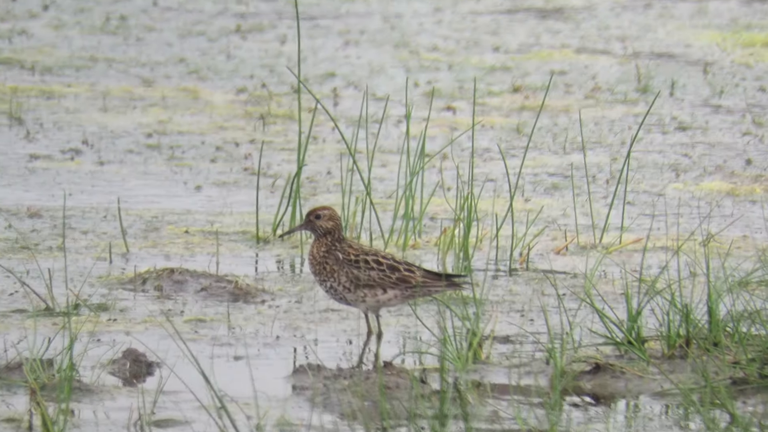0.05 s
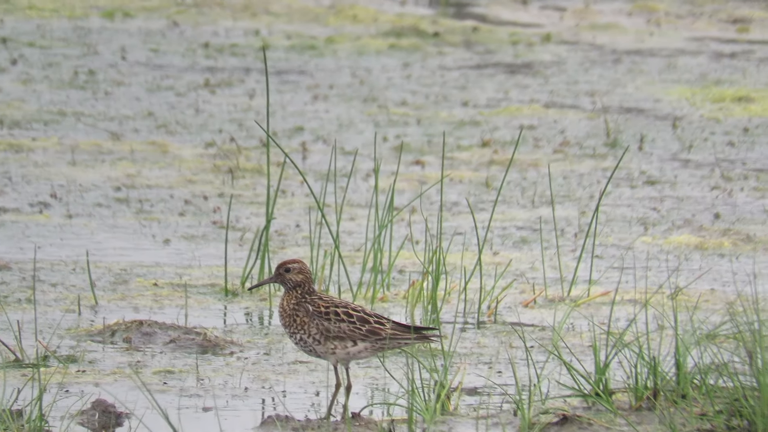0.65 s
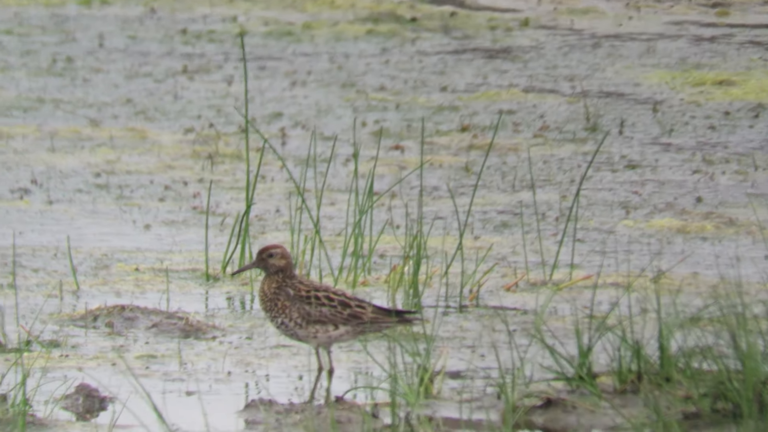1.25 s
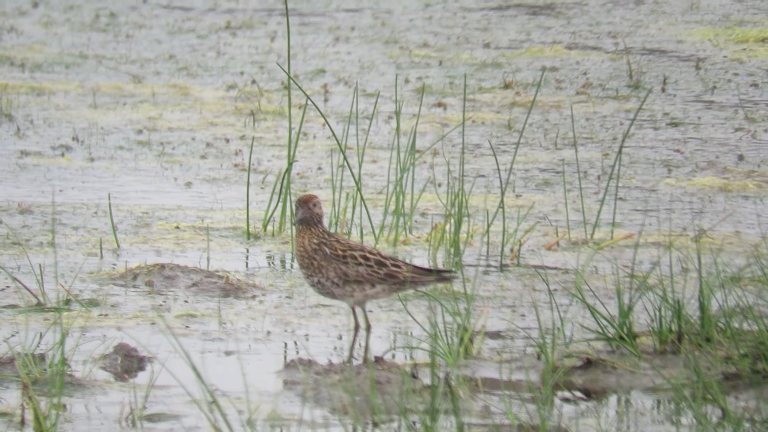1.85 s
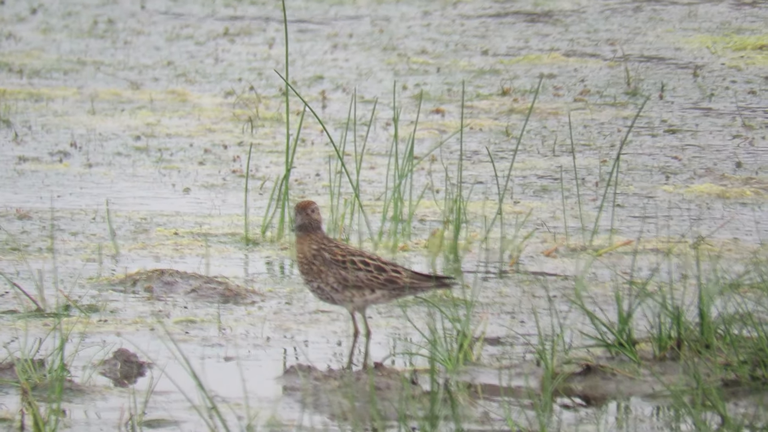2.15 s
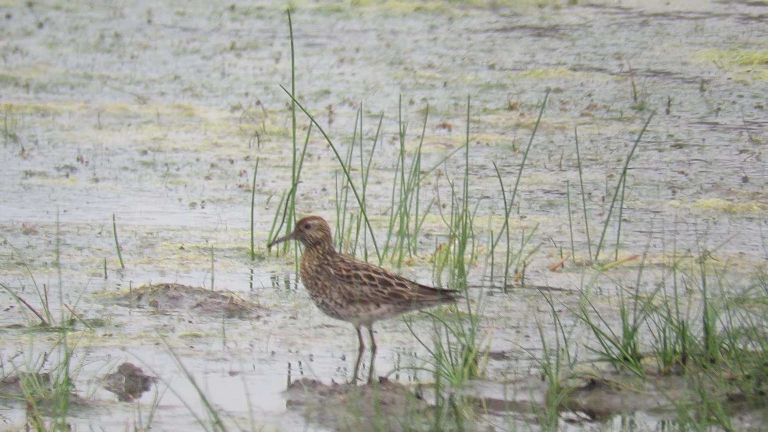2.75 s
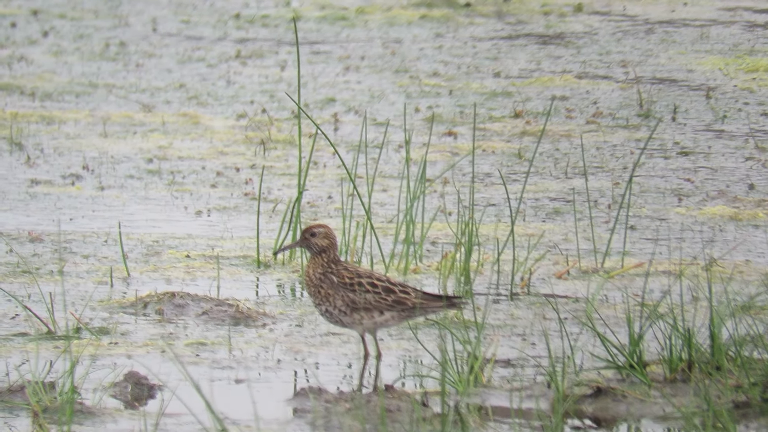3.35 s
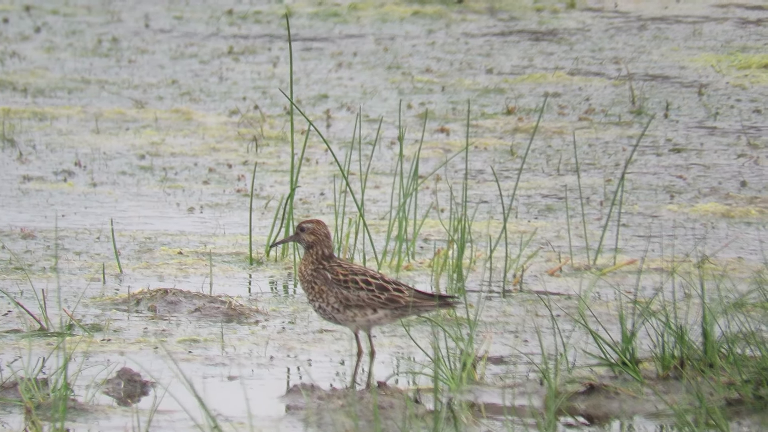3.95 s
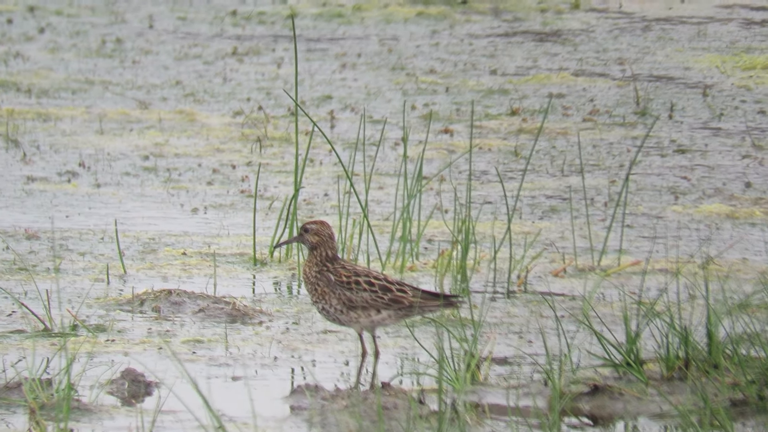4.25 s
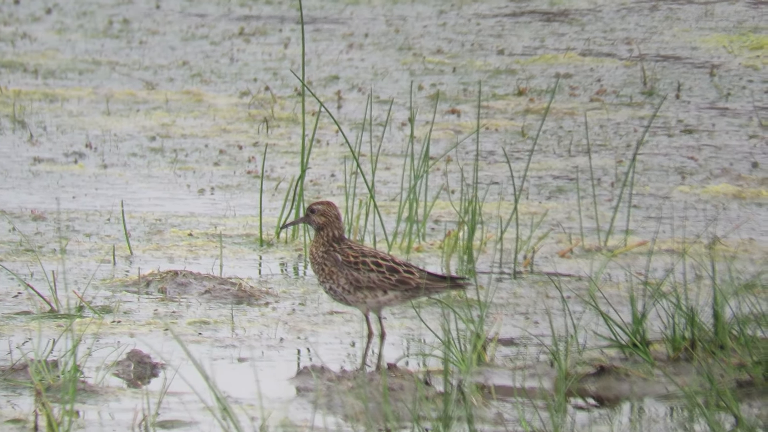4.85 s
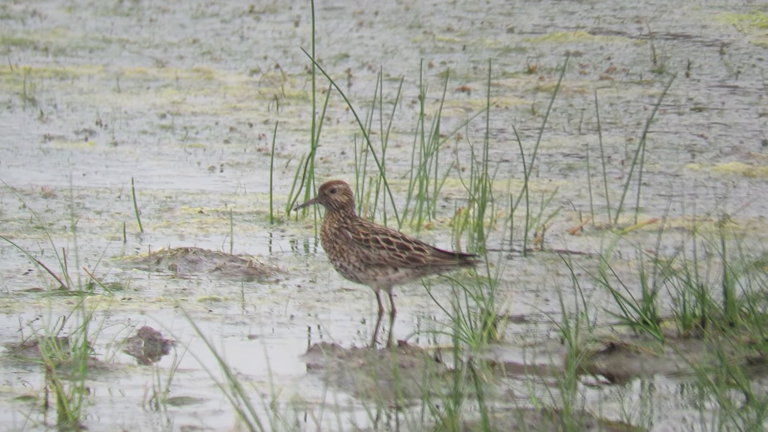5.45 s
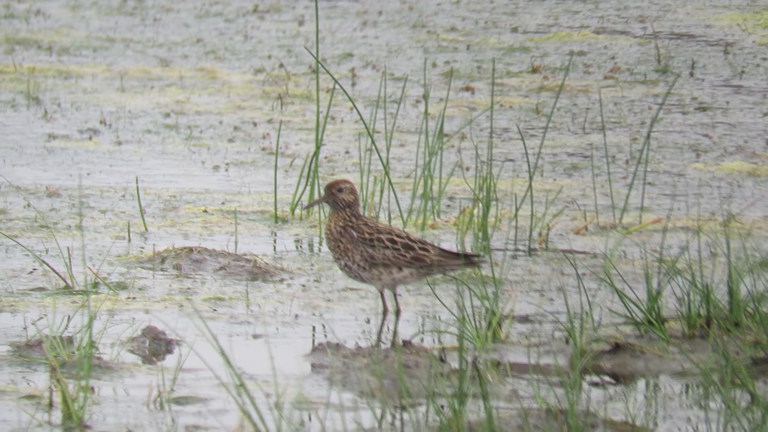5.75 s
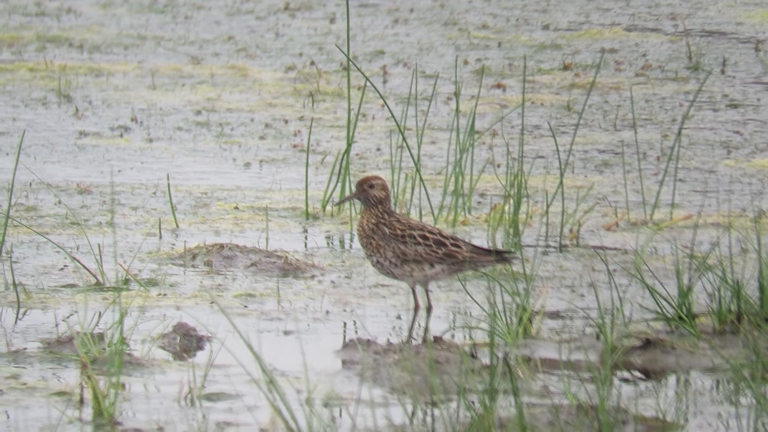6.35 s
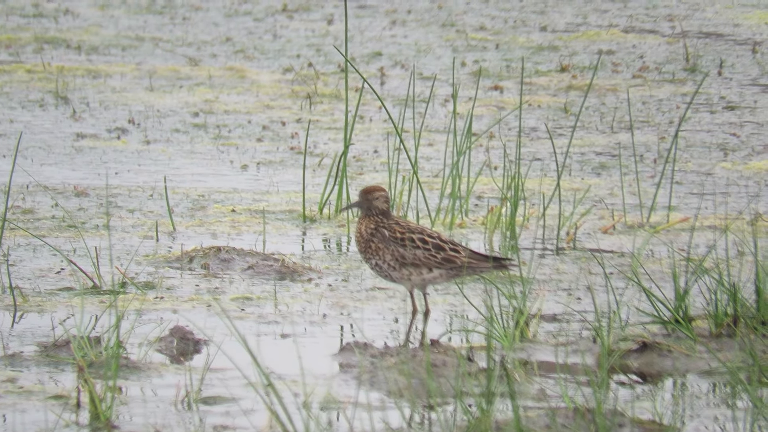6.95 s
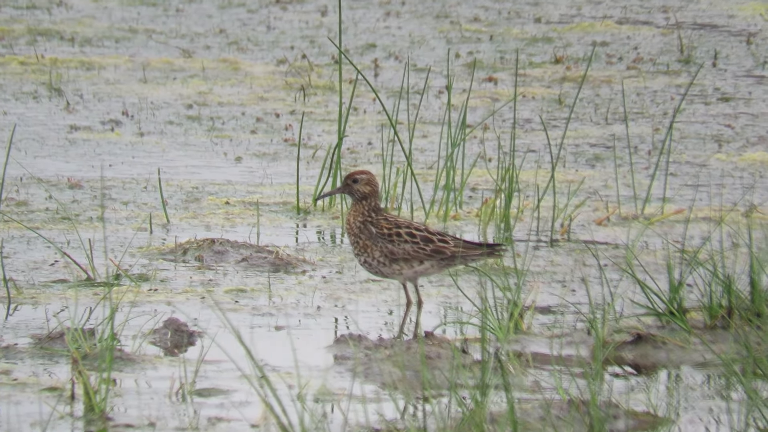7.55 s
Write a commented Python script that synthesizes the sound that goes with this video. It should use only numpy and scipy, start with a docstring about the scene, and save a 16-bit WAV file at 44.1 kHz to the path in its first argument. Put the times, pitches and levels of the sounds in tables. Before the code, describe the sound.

Uneven gusts buffet the microphone with a low, fluttering rumble, easing briefly to faint hiss, with a few small knocks and a single chirp.

```python
"""Gusty wind buffets a camera's two-port microphone at a shallow lake shore.
Eddies thump and flutter on the ports; hard gusts tick and the housing takes a few small knocks.
An insect's wing strokes buzz at a very high pitch in the grass, a near bird chirps once, far birds peep.
Behind them: the soft whirr of the lens, distant air and a steady hiss."""
import sys
import numpy as np
from scipy import signal
from scipy.fft import rfft, irfft
from scipy.io import wavfile
from scipy.ndimage import uniform_filter1d

SR = 44100
rng = np.random.default_rng(int(sys.argv[2]) if len(sys.argv) > 2 else 0)


def file_out(sig):
    """Save sig as 16-bit WAV at sys.argv[1]."""
    # one column per channel
    cols = np.atleast_2d(sig).T
    # limit, then scale
    lim = np.clip(cols, -1, 1)
    pcm = np.round(lim * 32767).astype(np.int16)
    wavfile.write(sys.argv[1], SR, pcm)


N = 340011
T = np.arange(N) / SR
HZ = np.fft.rfftfreq(N, 1 / SR)

# gusts (hold start [s], hold [s], level [dB], flutter share [dB])
GUSTS = [(0.078,0.01,-32,-5.5), (0.129,0.031,-36.5,-7), (0.373,0.04,-35.5,-5), (0.448,0.057,-32,-2),
         (0.558,0.014,-38,-6), (0.657,0.033,-37,-2.5), (0.795,0.03,-41,-5), (0.879,0.015,-27,-0.5),
         (0.914,0.06,-30,-1), (0.984,0.073,-33.5,-1.5), (1.139,0.025,-30,-2.5), (1.214,0.041,-32.5,-7.5),
         (1.265,0.06,-30,-1.5), (1.331,0.06,-36,-10), (1.506,0.14,-38.5,-3.5), (1.794,0.047,-33.5,-1.5),
         (1.878,0.089,-29.5,-1.5), (2.077,0.0082,-31,-2.5), (2.2,.052,-30,-4), (2.282,.03,-33.5,-4.5),
         (2.366,0.028,-33.5,-8.5), (2.45,0.018,-30,-4.5), (2.637,.065,-47,-11), (2.787,0.037,-44.5,-9.5),
         (3.235,0.015,-29.5,-3.5), (3.279,0.02,-34,-14.5), (3.342,0.081,-34.5,-5.5),
         (3.396,0.059,-29.5,-3.5), (3.491,0.087,-26.5,-3.5), (3.618,0.087,-26,-3.5),
         (3.73,0.037,-29.5,-6.5), (3.774,0.047,-30,0), (3.822,0.058,-28,-10.5), (3.897,0.014,-32.5,-6),
         (3.966,.016,-35,-18), (3.996,0.048,-26.5,-6), (4.08,.035,-39,-7.5), (4.132,0.068,-26.5,-5),
         (4.216,0.067,-28.5,-9), (4.297,0.069,-29,-2.5), (4.383,0.016,-25.5,-3.5), (4.41,.09,-30.5,-1.5),
         (4.531,0.028,-29,-9), (4.584,0.077,-34,-1.5), (4.687,0.044,-31.5,-6.5), (4.754,0.021,-40,-8),
         (4.954,0.02,-29,-6.5), (5.028,.017,-27.5,-1.5), (5.057,0.079,-38,-13.5), (5.147,0.048,-39,-4),
         (5.32,0.013,-40.5,-4), (5.454,0.045,-40,-21), (5.534,0.082,-47,-7.5), (5.655,0.083,-41.5,-4.5),
         (5.918,0.09,-41.5,-14), (6.058,0.049,-42.5,-20), (6.748,0.086,-54.5,-2.5),
         (7.284,0.021,-33.5,-2.5), (7.36,0.02,-38.5,-13), (7.432,0.054,-36.5,0), (7.505,0.037,-37,-7),
         (7.665,0.06,-35.5,-2.5)]
# large single eddies, slaps to booms (time [s], level [dB], pitch [Hz], half length [s])
BUFFETS = [(0.037,-21,260,0.0014), (0.216,-30.5,151,0.0078), (0.452,-17,206,0.0056), (0.683,-23,357,0.0025),
           (.934,-20,360,0.0045), (0.957,-18,370,0.0023), (0.97,-17.5,356,0.0032), (0.991,-21.5,260,0.0044),
           (1.015,-21,345,0.0018), (1.16,-24,226,0.0047), (1.206,-15.5,277,0.0018), (1.309,-17,267,0.0055),
           (1.467,-24,254,0.0017), (1.507,-23,206,0.0025), (1.595,-24.5,292,0.003), (1.743,-16,350,0.0016),
           (1.841,-18,281,.002), (1.861,-21.5,254,0.0043), (1.902,-14.5,299,0.0012),
           (2.108,-20.5,358,0.0034), (2.176,-17,227,0.0026), (2.213,-19,343,0.0066), (2.247,-22,373,0.0044),
           (2.372,-22,156,0.0051), (2.44,-21,227,0.0018), (2.457,-25,205,0.0098), (2.563,-35.5,170,.0044),
           (2.597,-33,150,0.0058), (2.789,-22,135,0.0054), (2.899,-29,113,0.007), (3.002,-28,140,0.0037),
           (3.152,-17.5,180,0.0051), (3.234,-23,269,0.0017), (3.28,-28.5,196,0.0047), (3.42,-8,334,0.0016),
           (3.523,-11.5,287,0.0015), (3.568,-17.5,232,.003), (3.672,-20,364,0.0033),
           (3.69,-14.5,198,0.0023), (3.786,-17,327,0.0033), (3.842,-19,231,0.0028), (3.912,-23.5,284,.0043),
           (3.989,-12,231,0.0021), (4.028,-16,229,0.0067), (4.143,-16.5,266,0.0063), (4.246,-17,215,0.0021),
           (4.308,-14,239,0.0029), (4.331,-17,203,0.0048), (4.381,-13.5,251,0.0029),
           (4.391,-17.5,338,0.0025), (4.42,-20.5,329,0.0015), (4.474,-18.5,282,0.0033),
           (4.596,-19,267,0.0038), (4.63,-21,280,.0025), (4.665,-15,239,0.0022), (4.805,-27,171,0.0023),
           (4.865,-24,228,0.0019), (4.974,-14,264,0.0015), (5.03,-24.5,198,.0025), (5.066,-24.5,181,0.0082),
           (5.157,-22,290,0.0016), (5.379,-30,218,0.0021), (5.473,-20.5,251,0.0024),
           (5.547,-28.5,143,.0043), (5.665,-20.5,272,0.0029), (5.916,-38,132,0.012),
           (5.953,-26.5,162,0.002), (6.059,-26.5,179,0.0028), (6.08,-29,295,0.0034),
           (6.525,-40.5,161,0.0049), (6.6,-36.5,131,0.0023), (6.781,-44.5,129,0.022),
           (6.83,-35.5,207,0.0023), (7.187,-40.5,153,0.0032), (7.244,-37.5,134,.0048),
           (7.569,-16.5,290,0.0016), (7.628,-20,327,0.0016), (7.67,-23.5,155,.0053)]
# light wind between gusts (time [s], level [dB], deep eddy level [dB])
BREEZE = [(0.0, -43.5, -59), (0.2, -49, -42.5), (0.31, -55, -58), (0.5, -48, -50), (0.6, -52, -53),
          (0.72, -49, -48), (0.98, -38.5, -60), (1.1, -39.5, -56), (1.3, -38, -54), (1.44, -49.5, -52),
          (2.05, -43.5, -56.5), (2.46, -47, -44.5), (2.73, -62, -62), (3.12, -52, -51.5),
          (3.42, -39.5, -49.5), (4.35, -36.5, -57), (4.88, -51, -66), (5.3, -51, -58), (5.8, -56.5, -55),
          (6.25, -81, -66.5), (7.06, -74, -71), (7.37, -46.5, -55), (7.71, -39.5, -58)]
# largest, slowest eddies (frequency [Hz], density [dB])
DEEP_SPECTRUM = [(15, -26), (30, -16), (55, -9), (95, 2), (140, -8.5), (240, -51)]
# slow turbulence (frequency [Hz], density [dB])
RUMBLE_SPECTRUM = [(20, -38.5), (55, -31), (90, -7), (140, 1.5), (220, 0), (290, -6.5), (370, -20.5),
                   (500, -33)]
# fast turbulence (frequency [Hz], density [dB])
FLUTTER_SPECTRUM = [(120, -36), (220, -27), (310, 2), (400, 0), (480, -5.5), (700, -20)]
# microphone response to wind (frequency [Hz], gain [dB])
WIND_RESPONSE = [(10, -49.5), (40, -4.5), (90, -0.5), (440, 2), (485, 2), (530, -17.5), (640, -12),
                 (800, -30), (1500, -57.5), (3000, -95)]
# wind difference between ports (frequency [Hz], gain [dB])
SIDE_RESPONSE = [(50, -41), (90, -33), (160, -22.5), (250, -15.5), (350, -10.5), (450, -8)]
# port difference, raised as the strongest gust veers (time [s], gain [dB])
VEER = [(0, -11), (2.8, -5.5), (3.15, 3.5), (3.4, 4.5), (3.95, 3), (4.25, 2.5), (4.5, -10), (7.7, -9.5)]
# ticks in gusts (time [s], level [dB])
TICKS = [(0.942, -37.5), (0.953, -42), (0.963, -41), (1.753, -42.5), (1.912, -43), (3.406, -36.5),
         (3.427, -36.5), (4.321, -39.5), (5.685, -45)]
# ticks and rushing air (frequency [Hz], density [dB])
TICK_SPECTRUM = [(300, 0), (700, 23.5), (1500, 13), (3000, 2.5), (6000, -11.5), (12000, -30)]
# housing knocks (time [s], pitch [Hz], level [dB], T60 [s])
KNOCKS = [(1.325, 1440, -41, 0.027), (1.325, 2700, -44, 0.011), (2.461, 540, -32.5, 0.041),
          (4.327, 580, -34, 0.044), (4.625, 562, -26.5, 0.032)]
# insect bouts (start [s])
BUZZ_STARTS = [0.008, 0.84, 1.45, 2.33, 2.87, 3.3, 4.34, 4.82, 5.83, 6.4, 7.38]
# insect resonance (frequency [Hz], density [dB])
WING_SPECTRUM = [(9800, -35), (10900, -12), (11350, -14), (11600, 0), (11800, 0), (12100, -14),
                 (12900, -14), (13500, -30)]
# chirp contour (time [s], pitch [Hz], level [dB])
CHIRP = [(4.5505, 2100, -62), (4.553, 2350, -51.5), (4.559, 2520, -48), (4.564, 2540, -48),
         (4.569, 2390, -50), (4.574, 2230, -57), (4.581, 2100, -76)]
# hoarse chirp onset (frequency [Hz], density [dB])
RASP_SPECTRUM = [(2000, -40), (3000, -9), (4200, 2), (5500, -38)]
# far birds (start [s], length [s], pitch [Hz], level [dB])
PEEPS = [(1.44, .055, 3300, -72), (1.615, .035, 3400, -72.5), (1.675, .03, 3520, -72.5),
         (2.61, .085, 4380, -77.5), (5.875, .075, 4900, -75.5), (6.005, .03, 4120, -75.5),
         (7.07, .03, 4400, -76)]
# lens resonances (centre [Hz], half width [Hz], level [dB])
WHIRR_MODES = [(390, 16, -67), (800, 28, -66.5), (953, 42, -64.2), (1075, 75, -66.5)]
# whirr strength (time [s], gain [dB])
WHIRR_GAIN = [(0, -2.5), (0.8, 0), (1.5, 0.5), (2.1, -1), (3.8, 0.5), (4.4, -0.5), (4.85, 3), (5.55, -1.5),
              (6.2, 2.5), (7.7, 0)]
# hum within the whirr (time [s], level [dB])
HUM_LEVEL = [(.3, -80), (.9, -67.5), (1.45, -61.5), (2.1, -69.5), (2.85, -72), (3.6, -68), (4.4, -68.5),
             (4.9, -64.5), (6.1, -64.8), (7.7, -70)]
# electronics whines (centre [Hz], half width [Hz], level [dB], port phase lag [rad])
WHINES = [(7434, 3, -87.5, 2.3), (8150, 3, -91.5, 1.3), (8190, 40, -92, 1.0), (11149, 3, -96, 1.0),
          (11930, 60, -92, 0.3)]
# lens motor squeaks (start [s], length [s], pitch [Hz], level [dB])
SQUEAKS = [(0.98, .04, 11170, -80), (3.541, .051, 12030, -73.5)]
# air over the lake (frequency [Hz], density [dB])
AIR_SPECTRUM = [(20, -32), (55, 7), (120, 4), (250, -1), (520, -0.5), (720, -2), (1100, -3), (1250, -9),
                (1450, -7), (1800, -14), (3000, -23), (8000, -49.5)]
# port hiss (frequency [Hz], density [dB])
HISS_SPECTRUM = [(250, -31), (700, -1), (1500, 3), (2400, 3), (4300, -0.5), (6500, -5.5), (10000, -10.5),
                 (12000, -10.5), (13000, -18), (14000, -23)]


def wind(lump_db=6.5, lump_hz=80, deep_db=2.0, deep_follow=0.51, side_lag_s=0.00045, own_db=-2.5):
    """Lumpy turbulence and single eddies press on both ports; mainly the small eddies differ."""
    times_s, *levels_db = np.transpose(BREEZE)
    breeze_db, depth_db = (np.interp(T, times_s, db) for db in levels_db)
    slow_power, fast_power = turbulence_power()
    lumps = gain_of(lump_db * np.clip(wander(lump_hz), -2, 1))
    lumps = unit_rms(steadied(lumps, span_s=0.04))
    rumble = np.sqrt(slow_power * lumps) * steadied(noise(RUMBLE_SPECTRUM), span_s=0.027)
    flutter = np.sqrt(fast_power) * lumps * steadied(noise(FLUTTER_SPECTRUM), span_s=0.044)
    # the largest eddies linger through lulls and only partly follow gusts
    swell_db = deep_follow * (10 * np.log10(slow_power + fast_power) - breeze_db)
    deep = gain_of(deep_db + depth_db + swell_db) * steadied(noise(DEEP_SPECTRUM), span_s=0.033)
    pressure = rumble + flutter + deep + buffets()
    force = np.sqrt(abs(uniform_filter1d(pressure ** 2, size=400)))
    # wind from one side: ports differ in strength, timing and their own small eddies
    eddy_noise = noise(RUMBLE_SPECTRUM) + 0.5 * noise(FLUTTER_SPECTRUM)
    own_eddies = gain_of(own_db) * force * steadied(eddy_noise, span_s=0.027)
    side = envelope(VEER) * colour(delayed(pressure, side_lag_s) + own_eddies, SIDE_RESPONSE)
    ports = np.array([pressure + side, pressure - side])
    return colour(ports, WIND_RESPONSE) + force * rush()


def turbulence_power(puff_db=4, puff_hz=11, rise_s=0.0082, fall_s=0.0072, wake_db=-18, wake_s=0.0093):
    """Slow and fast turbulence power from a puffing breeze, gusts and the wakes of large eddies."""
    breeze_db = np.interp(T, *np.transpose(BREEZE)[:2]) + puff_db * np.clip(wander(puff_hz), -2, 1)
    total = gain_of(breeze_db) ** 2
    share_db = -12.5 + 0.17 * (breeze_db + 44)  # a stronger breeze flutters more
    fast = total * gain_of(np.minimum(share_db, 0)) ** 2
    for start_s, hold_s, db, flutter_db in GUSTS:
        rise = np.clip(1 + (T - start_s) / rise_s, 0, 1)
        fall = np.exp(-np.clip((T - start_s - hold_s) / fall_s, 0, 20))
        gust = (gain_of(db) * rise * fall) ** 2
        total += gust
        fast += gust * gain_of(min(flutter_db, 0)) ** 2
    for time_s, db, _, _ in BUFFETS:
        near = abs(T - time_s) < 2 * wake_s
        wake = gain_of(db + wake_db) * np.exp(-((T[near] - time_s) / wake_s) ** 2)
        total[near] += wake ** 2
    return np.maximum(total - fast, 0), fast


def buffets(slowing=0.23):
    """Each large eddy is a few pressure swings at most, slowing as it passes."""
    out = np.zeros(N)
    for (time_s, db, hz, half_s), phase_cycles in zip(BUFFETS, rng.random(len(BUFFETS))):
        near = abs(T - time_s) < 4 * half_s
        t = T[near] - time_s
        passage = t / half_s
        cycles = phase_cycles + hz * t * (1 - slowing * np.tanh(passage / 2))
        out[near] += gain_of(db) * np.exp(-passage ** 2) * np.cos(2 * np.pi * cycles)
    return out


def rush(hiss_db=-37.5, crackle_db=-40.5, crackles_per_s=60):
    """Air hisses and crackles over the camera body, per unit of wind force."""
    snaps = rng.standard_normal((2, N)) * (rng.random((2, N)) < crackles_per_s / SR)
    crackle = unit_rms(colour(snaps, TICK_SPECTRUM))
    hiss = np.array([noise(TICK_SPECTRUM), noise(TICK_SPECTRUM)])
    return gain_of(hiss_db) * hiss + gain_of(crackle_db) * crackle


def ticks(boost_db=3.5):
    """Tiny snaps at the ports where gusts strike hard."""
    times_s, db = np.transpose(TICKS)
    impulses = np.zeros(N)
    impulses[np.round(times_s * SR).astype(int)] = gain_of(db)
    snaps = colour(impulses, TICK_SPECTRUM)
    return gain_of(db.max() + boost_db) * snaps / abs(snaps).max()


def knocks(rise_s=0.0021):
    """Knocks ring short, dull resonances of the housing."""
    out = np.zeros(N)
    for time_s, hz, db, t60_s in KNOCKS:
        t = np.maximum(T - time_s, 0)
        attack = 1 - np.exp(-t / rise_s)
        out += gain_of(db - 60 * t / t60_s) * attack * np.sin(2 * np.pi * hz * t)
    return out


def insect(level_db=-82, bout_s=0.243, stroke_hz=90, depth=0.35):
    """Short bouts of fast wing strokes ring a very high resonance."""
    bouts = gain_of(level_db) * sum(gate(start_s, bout_s, edge_s=0.017) for start_s in BUZZ_STARTS)
    strokes = 1 + depth * sine(stroke_hz * (1 + 0.06 * wander(rate_hz=9.6)))
    resonance = noise(WING_SPECTRUM) + 0.5 * np.array([noise(WING_SPECTRUM), noise(WING_SPECTRUM)])
    return bouts * strokes * resonance


def near_bird(rasp_db=-19.5, rasp_s=0.015, echo_db=-17.5, echo_s=0.097, port_lag_s=0.00005):
    """One arched, slightly hoarse chirp; the shore echoes it."""
    times_s, hz, db = np.transpose(CHIRP)
    start_s, length_s = times_s[0], times_s[-1] - times_s[0]
    pitch_hz = np.interp(T, times_s, hz) * (1 + 0.0256 * wander(rate_hz=500))
    roughness = 1 + 0.35 * wander(rate_hz=470)
    level = gain_of(np.interp(T, times_s, db)) * gate(start_s, length_s, edge_s=0.0016) * roughness
    rasp = gain_of(rasp_db) * gate(start_s, rasp_s, edge_s=0.002) * noise(RASP_SPECTRUM)
    call = level * (np.sqrt(2) * sine(pitch_hz) + rasp)
    call += gain_of(echo_db) * delayed(call, echo_s)
    return np.array([call, delayed(call, port_lag_s)])


def far_birds(fall=0.03, blur=0.036):
    """Thin, slightly falling peeps, blurred by distance."""
    out = np.zeros(N)
    waver = 1 + blur * wander(rate_hz=375)
    for start_s, length_s, hz, db in PEEPS:
        glide = 1 - fall * np.clip((T - start_s) / length_s - 0.5, -0.5, 0.5)
        level = gain_of(db) * gate(start_s, length_s, edge_s=0.0032)
        out += level * np.sqrt(2) * sine(hz * waver * glide)
    return out


def lens(hum_hz=1029, waver_hz=3.5):
    """Narrow resonances whirr and hum in the body; electronics whine, the motor squeaks twice."""
    whirr = sum(gain_of(db) * ring(hz, half_width_hz).real for hz, half_width_hz, db in WHIRR_MODES)
    hum = np.sqrt(2) * sine(hum_hz + waver_hz * wander(rate_hz=12.8))
    out = np.zeros((2, N)) + envelope(WHIRR_GAIN) * whirr + envelope(HUM_LEVEL) * hum
    for hz, half_width_hz, db, lag_rad in WHINES:
        port_phase = np.exp(-1j * np.array([[0], [lag_rad]]))
        out += gain_of(db) * (ring(hz, half_width_hz) * port_phase).real
    for start_s, length_s, hz, db in SQUEAKS:
        level = gain_of(db) * gate(start_s, length_s, edge_s=0.003)
        out += level * np.sqrt(2) * np.sin(2 * np.pi * hz * T)
    return out


def air_and_hiss(air_db=-58.5, swell_db=1.73, hiss_db=-63.0, antiphase=0.12):
    """Distant air, alike at both ports, and each port's own hiss, spread wide."""
    air = gain_of(air_db - swell_db * wander(rate_hz=6.3)) * patchy(noise(AIR_SPECTRUM))
    hiss = np.array([patchy(noise(HISS_SPECTRUM)), patchy(noise(HISS_SPECTRUM))])
    return air + gain_of(hiss_db) * (hiss - antiphase * hiss[::-1])


def patchy(x, depth_db=1.6):
    """Faint mottling of a noise: patches a few hundred Hz wide swell and fade."""
    frames = signal.stft(x, nperseg=512)[2]
    patches = uniform_filter1d(rng.standard_normal(frames.shape), size=3, axis=0)
    patches = unit_rms(uniform_filter1d(patches, size=5, axis=1))
    return unit_rms(signal.istft(frames * gain_of(depth_db * patches))[1][:N])


def gain_of(db):
    """Decibels to amplitude."""
    return 10 ** (np.asarray(db) / 20)


def envelope(points):
    """Amplitude along (time [s], level [dB]) points."""
    return gain_of(np.interp(T, *np.transpose(points)))


def unit_rms(x):
    """Scales to rms 1."""
    return x / np.sqrt(np.mean(x ** 2) + 1e-20)


def colour(x, points):
    """Filters by (frequency [Hz], gain [dB]) points on a log-frequency axis."""
    hz, db = np.transpose(points)
    return irfft(rfft(x) * gain_of(np.interp(np.log(HZ + 1), np.log(hz), db)), N)


def noise(spectrum):
    """Coloured noise, rms 1."""
    return unit_rms(colour(rng.standard_normal(N), spectrum))


def wander(rate_hz):
    """Random drift up to about rate_hz, rms 1."""
    return unit_rms(irfft(rfft(rng.standard_normal(N)) * np.exp(-(HZ / rate_hz) ** 2), N))


def ring(hz, half_width_hz):
    """Noise in one narrow resonance; complex, real part rms 1."""
    spectrum = rfft(rng.standard_normal(N)) / (1 + ((HZ - hz) / half_width_hz) ** 2)
    return unit_rms(irfft(spectrum, N)) + 1j * unit_rms(irfft(-1j * spectrum, N))


def sine(pitch_hz):
    """Sine along a pitch curve, peak 1."""
    return np.sin(2 * np.pi * np.cumsum(pitch_hz) / SR)


def gate(start_s, length_s, edge_s):
    """Window with linear edges."""
    return np.clip(np.minimum(T - start_s, start_s + length_s - T) / edge_s, 0, 1)


def steadied(x, span_s):
    """Flattens swells slower than span_s."""
    power = abs(uniform_filter1d(x ** 2, max(round(span_s * SR), 8)))
    return x / np.sqrt(power + 0.0044)


def delayed(x, delay_s):
    """Fractional delay."""
    return np.interp(T - delay_s, T, x)


def scene():
    """Sum at the two ports."""
    return wind() + ticks() + knocks() + air_and_hiss() + lens() + insect() + near_bird() + far_birds()


def record(dry, cutoff_hz=14100):
    """The camera's band limit."""
    taps = signal.firwin(511, cutoff_hz, window=("kaiser", 9), fs=SR)
    return signal.oaconvolve(dry, taps[None], "same")


dry = scene()
out = record(dry)
file_out(out)
```